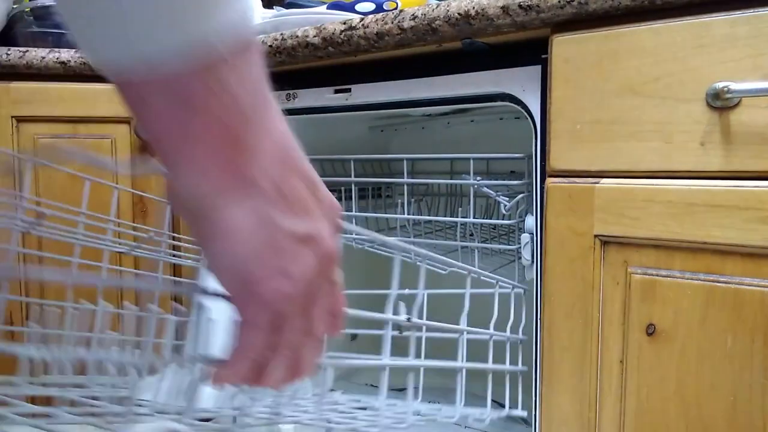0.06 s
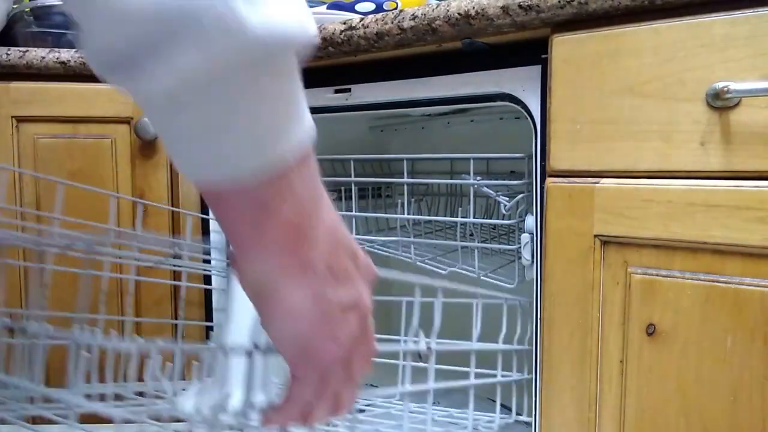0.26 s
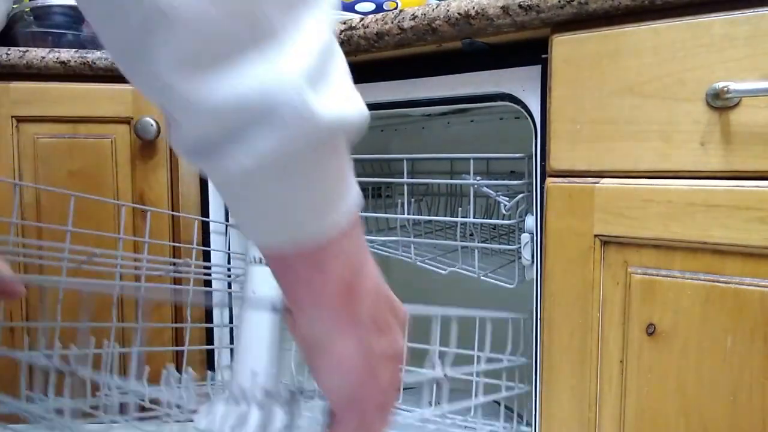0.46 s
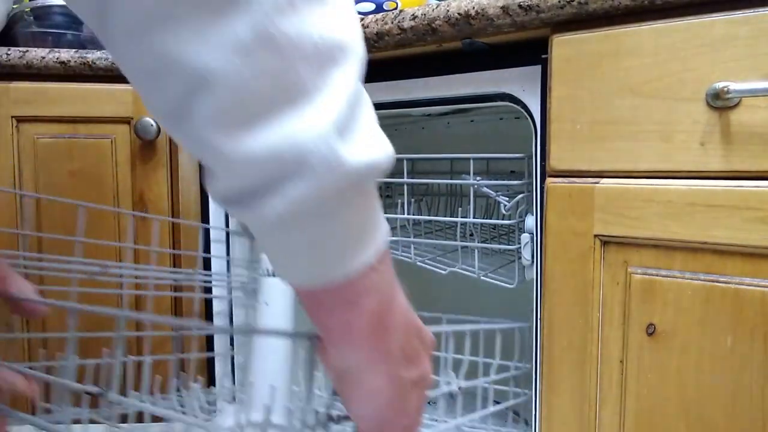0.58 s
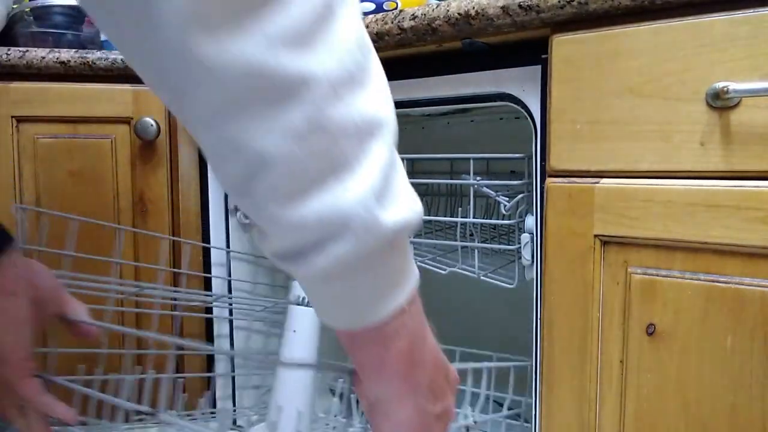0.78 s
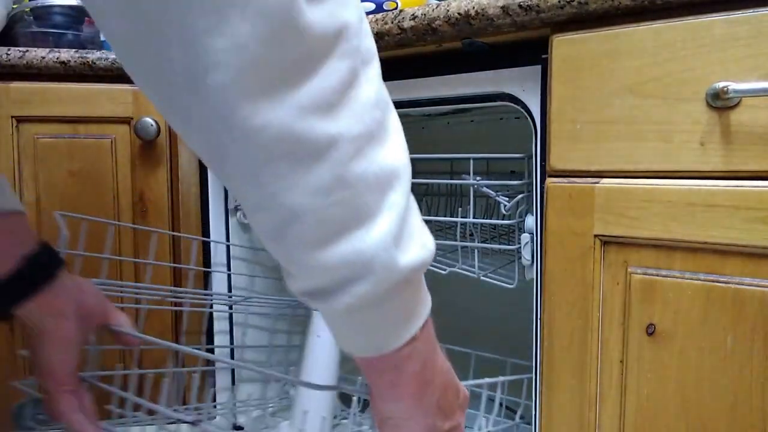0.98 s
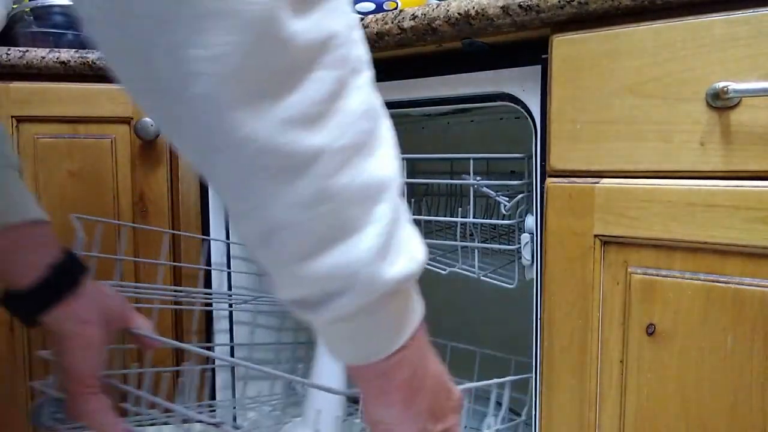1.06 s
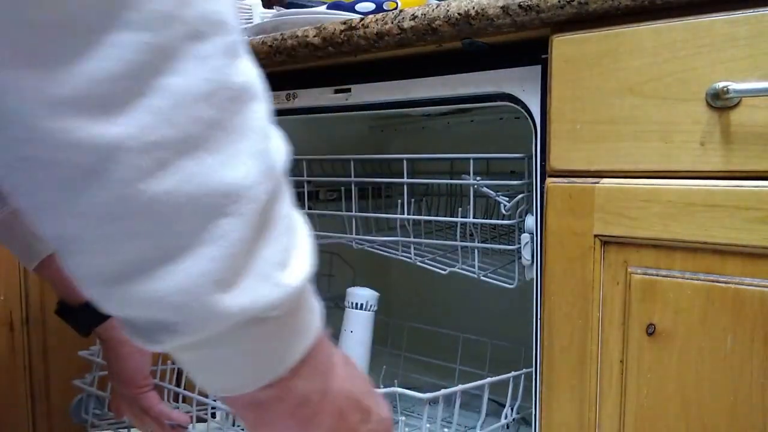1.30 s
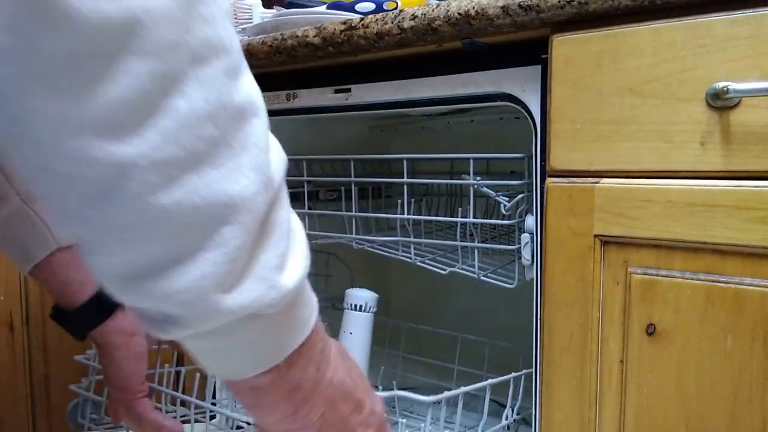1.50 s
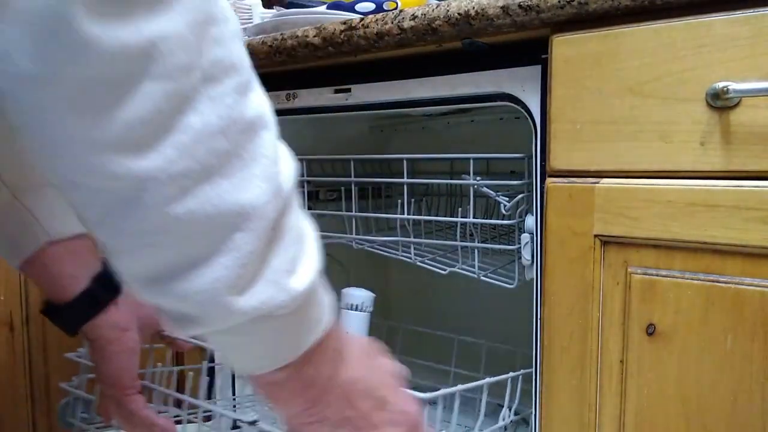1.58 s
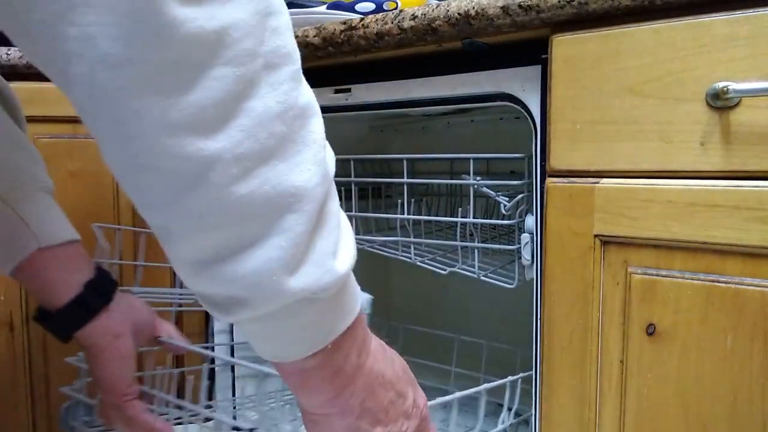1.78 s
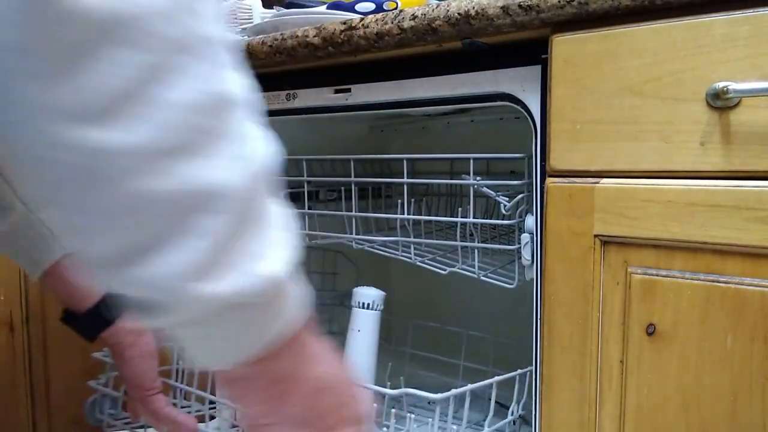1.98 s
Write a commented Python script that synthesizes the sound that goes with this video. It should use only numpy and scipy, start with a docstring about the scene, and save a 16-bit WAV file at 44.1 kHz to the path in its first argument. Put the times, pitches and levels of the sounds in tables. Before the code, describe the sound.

A wire dishwasher rack knocks and rattles against the hollow open door from about 0.2 seconds, with short scrapes between the knocks. It lands with one loud, briefly ringing clank at 0.8 seconds, then chatters and scrapes along the door, fading by 1.3 seconds. A lighter knock comes at 1.7 seconds and faint scraping follows near 2 seconds, over the low hush of a small kitchen.

```python
"""A faint scrape and a few light knocks sound over the hush of a small kitchen: a coated wire dishwasher
rack is lowered onto the open door and shoved along it. Its wires and wheels knock on the hollow door,
with one loud clank as it lands; between knocks it scrapes and chatters. Every contact rings the same
wires and door panel, and the room answers briefly."""
import sys
import numpy as np
from scipy import signal
from scipy.fft import rfft, irfft
from scipy.io import wavfile

SR = 44100
rng = np.random.default_rng(int(sys.argv[2]) if len(sys.argv) > 2 else 0)


def transcribe(u):
    """Save the signal u as a 16-bit wav file named by the first command-line argument.

    u: samples, shape (n,) or (channels, n), limited to [-1, 1]; the rate is SR.
    q: integer samples, one column per channel.
    """
    v = np.clip(np.atleast_2d(u).T, -1, 1)
    q = np.round(v * 32767).astype(np.int16)
    wavfile.write(sys.argv[1], SR, q)


N = 90404
SIZE = 32768  # samples per event
HZ, T = np.fft.rfftfreq(SIZE, 1 / SR), np.arange(SIZE) / SR


def amp(db):
    """Decibels to gain."""
    return 10 ** (np.asarray(db) / 20)


def curve(points, hz):
    """Interpolates (frequency, value) points on a log-frequency axis."""
    points_hz, values = np.transpose(points)
    return np.interp(np.log(hz + 1), np.log(points_hz + 1), values)


def add(mix, time_s, sound):
    """Mixes a stereo sound in at time_s."""
    part = mix[:, max(round(time_s * SR), 0):][:, :sound.shape[1]]
    part += sound[:, :part.shape[1]]


def ripple(width_hz):
    """Random spectral peaks and dips, growing in above the door's range."""
    knots = rng.standard_normal(len(HZ))
    return np.interp(HZ / width_hz, np.arange(len(HZ)), knots) * np.minimum(HZ / 1500, 1)


# stereo balance (frequency [Hz], left minus right [dB])
BALANCE = [(300, -.5), (700, -0.4), (2800, 1), (5500, 2.5), (10000, 0.5), (14000, 14)]
def balance_db(hz):
    """Left and right level offsets."""
    return np.outer([0.5, -0.5], curve(BALANCE, hz))


# likeness of the two channels (frequency [Hz], correlation [ratio])
CORRELATION = [(100, 0.98), (350, 0.91), (700, 0.66), (1400, 0.12), (6000, 0.033)]
def noise_spectra(size):
    """White noise at two microphones, alike in the bass."""
    a, b = rfft(rng.standard_normal((2, size)))
    correlation = curve(CORRELATION, np.fft.rfftfreq(size, 1 / SR))
    mid = a * np.sqrt((1 + correlation) / 2)
    side = b * np.sqrt((1 - correlation) / 2)
    return np.array([mid + side, mid - side])


def mode(hz, db, t60_s, rise_cycles=0.6, mic_spread_s=0.00018):
    """One decaying sine, reaching each microphone at a slightly different time."""
    phase = 2 * np.pi * (rng.random() + hz * mic_spread_s * rng.uniform(-0.44, 1, (2, 1)))
    attack = 1 - np.exp(-T * hz / rise_cycles)
    return amp(db - 60 * T / t60_s) * attack * np.sin(2 * np.pi * hz * T + phase)


def cluster(hz, width_ratio):
    """Crowded modes around one pitch: narrowband noise, unit RMS."""
    band = irfft(noise_spectra(SIZE) / (1 + ((HZ / hz - 1) / width_ratio) ** 2) ** 2)
    return band / band.std()


def ring_envelope(rise_s, ring_t60_s, tail_db, tail_t60_s):
    """Attack, fast first decay, weaker and slower tail."""
    attack = 1 - np.exp(-T / rise_s)
    return attack * np.hypot(amp(-60 * T / ring_t60_s), amp(tail_db - 60 * T / tail_t60_s))


# kitchen hush spectrum (frequency [Hz], relative density [dB])
HUSH = [(15, -52), (25, -42), (117, -5.5), (249, -1.5), (270, -12.5), (344, -6), (384, -9.5), (1300, -22.5),
        (16000, -35)]
def room_tone(rms_db=-66):
    """Low, steady hush of the kitchen."""
    hush = irfft(noise_spectra(N) * amp(curve(HUSH, np.fft.rfftfreq(N, 1 / SR))), N)
    return amp(rms_db) * hush / hush.std()


# flicked wires, and the ring of the rack's frame in the loud clank (time [s], pitch [Hz], level [dB])
PINGS = [(0.209, 2220, -42.5), (0.21, 3920, -42), (0.214, 7080, -42.5), (0.453, 8500, -41.5),
         (0.741, 14600, -50), (0.790, 14400, -37), (0.7905, 2165, -31.5), (0.800, 2150, -36.5),
         (1.0657, 3380, -51.5), (1.1196, 2580, -48.5), (1.168, 4900, -58), (1.1995, 3460, -55.5),
         (1.727, 2100, -50), (1.907, 4220, -59)]
def pings(note_db=-7.5, tail_db=-3.5, rise_s=0.00027, ring_t60_4khz_s=0.032, tail_t60_4khz_s=0.17):
    """Each ping rings one clear note in a tight cluster of modes; higher ones die sooner."""
    out = np.zeros((2, N))
    for time_s, hz, db in PINGS:
        decay_scale = (4000 / hz) ** 0.25
        t60_s = ring_t60_4khz_s * decay_scale
        envelope = ring_envelope(rise_s, t60_s, tail_db, tail_t60_4khz_s * decay_scale)
        ring = envelope * cluster(hz, width_ratio=0.12) + mode(hz, note_db, t60_s)
        add(out, time_s, amp(db + balance_db(hz)) * ring)
    return out


# joint response of door and rack (frequency [Hz], gain [dB])
RESPONSE = [(25, -31), (45, -28), (72, 6.5), (170, -2), (225, 1.5), (275, -5), (345, 2.5), (470, -6.5),
            (720, 2), (880, -0.5), (1100, 4.5), (1400, -2), (2200, -1.5), (4200, 1.5), (8500, 1),
            (11500, -6.5), (15500, -11)]
# contact bands: door thud, door body, clack, wire, tick, fizz
# (centre [Hz], rise [s], ring t60 [s], tail level [dB], tail t60 [s])
BANDS = [(101, 0.04, 0.26, -19.5, 0.425), (298, 0.0012, 0.06, -4, 0.4), (900, 0.00027, 0.0088, -4.5, 0.27),
         (2610, 0.00013, 0.013, -3.5, 0.24), (6900, 0.0012, 0.012, -2, 0.24),
         (15200, 0.00045, 0.039, -1, 0.28)]
def contact(levels_db, wire_ripple_db, fizz_re_tick_db=-4):
    """One contact: crowded door and wire modes die quickly and leave a tail in the room."""
    centres_hz = [band[0] for band in BANDS]
    bands_db = [*levels_db, levels_db[-1] + fizz_re_tick_db]
    excitation_db = curve(list(zip(centres_hz, bands_db)), HZ)
    spot_ripple_db = 3 * ripple(width_hz=415)  # each spot favours its own range of wire modes
    colour_db = excitation_db + curve(RESPONSE, HZ) + wire_ripple_db + spot_ripple_db
    pink_slope = np.sqrt(SR / 2 / (HZ + 1))
    spectra = noise_spectra(SIZE) * amp(colour_db + balance_db(HZ)) * pink_slope
    out = np.zeros((2, SIZE))
    for selector, (_, *envelope) in zip(np.eye(len(BANDS)), BANDS):
        band_gain = curve(list(zip(centres_hz, selector)), HZ)
        out += ring_envelope(*envelope) * irfft(spectra * band_gain)
    return out


# shoves along the door
# (start [s], length [s], door thud [dB], door body [dB], clack [dB], wire [dB], tick [dB])
SHOVES = [(0.0, 0.092, -64.5, -86, -81, -74.5, -71.5), (0.448, 0.066, -47, -48, -45, -46.5, -46.5),
          (0.506, 0.055, -60, -75, -41.5, -42, -54.5), (0.553, 0.038, -52, -51.5, -53, -51, -61),
          (0.644, 0.083, -62, -57, -47.5, -49, -59.5), (0.696, 0.084, -66, -45, -47, -47.5, -52.5),
          (0.831, 0.1, -55, -46, -41.5, -40.5, -47), (0.936, .07, -52, -50.5, -52, -57, -68),
          (1.043, 0.085, -51, -43.5, -49.5, -58, -64), (1.117, 0.082, -65, -53, -50.5, -62, -58.5),
          (1.221, 0.036, -62, -73, -57, -56.5, -68), (1.299, 0.047, -67.5, -53.5, -58.5, -61.5, -72.5),
          (1.822, 0.026, -68, -67, -58.5, -73.5, -78), (1.921, 0.092, -102, -68, -83, -69, -73),
          (2.024, 0.025, -88, -58.5, -72, -72, -67)]
def scrapes(wire_ripple_db, contacts_per_s=420, spots=3, spread_db=3.5, fade_s=0.0053):
    """The sliding rack chatters: small contacts at random moments on a few spots."""
    out = np.zeros((2, N))
    for start_s, length_s, *levels_db in SHOVES:
        stroke = np.clip(np.minimum(T, length_s - T) / fade_s, 0, 1)
        for _ in range(spots):
            strength = amp(spread_db * np.minimum(rng.exponential(1, SIZE), 3))
            polarity = rng.choice([-1, 1], SIZE)
            touching = rng.random(SIZE) < contacts_per_s / spots / SR
            clicks = strength * polarity * touching * stroke
            clicks *= np.sqrt(length_s / 0.035) / (np.linalg.norm(clicks) + 1e-6)  # unit energy per 35 ms
            chatter = signal.fftconvolve(contact(levels_db, wire_ripple_db), clicks[None], axes=1)
            add(out, start_s, chatter)
    return out


# onsets of hard blows (time [s], level [dB])
BLOW_CRACKS = [(0.2101, -43), (0.656, -50), (0.732, -54), (0.7894, -28), (0.7944, -24), (1.023, -49),
               (1.727, -41)]
def cracks(decay_s=0.0011, lowpass_hz=1700):
    """A hard blow starts with a dry crack: a millisecond or two of dulled noise."""
    out = np.zeros((2, N))
    for time_s, db in BLOW_CRACKS:
        burst = irfft(noise_spectra(SIZE) * amp(balance_db(HZ)) / np.hypot(1, HZ / lowpass_hz))
        add(out, time_s, amp(db) * np.exp(-T / decay_s) * burst / burst.std())
    return out


# modes of the rack's frame (frequency [Hz], relative level [dB], t60 [s])
FRAME_MODES = [(343.4, -14.5, 0.13), (690, -20, 0.155), (1024, -6, 0.3), (1142, -32.5, 0.51),
               (2210, -16, 0.072)]
# wheels and wires striking the door (time [s], door thud [dB], door body [dB], clack [dB], wire [dB],
# tick [dB], note pitch [Hz], note level [dB])
BLOWS = [(0.212, -57.5, -35.5, -50.5, -38, -43, 380, -45.5), (0.254, -47, -42, -49, -43, -47.5, 335, -41.5),
         (0.2828, -52, -73, -40, -36.5, -42, 75, -41.5), (0.310, -74, -48, -56, -49, -78, 948, -38),
         (0.4138, -49, -48, -40, -62, -58.5, 643, -36), (0.424, -83, -34.5, -42.5, -43.5, -49.5, 79, -29.5),
         (0.439, -40.5, -43, -44.5, -45, -48, 315, -46), (0.523, -74, -42, -61, -57, -44, 1016, -46),
         (0.654, -42, -44.5, -46.5, -55, -65, 152, -35.5), (0.682, -61, -63, -60, -55, -71, 113.8, -31),
         (0.732, -42, -38.5, -37, -43, -65, 647, -30), (0.7427, -41.5, -32, -85, -79, -48.5, 241, -48),
         (0.7903, -33, -40, -28.5, -36, -31, 709, -21), (0.7965, -46, -28, -48, -37, -42.5, 765, -18.5),
         (0.8031, -69, -23.5, -52, -32, -61, 739, -22.5), (0.817, -38, -51, -44, -35.5, -52, 329, -25),
         (0.845, -66, -42.5, -29, -39, -51, 593, -26), (0.911, -47, -51, -34, -43.5, -54, 1093, -34),
         (0.955, -75, -48, -73, -42, -59, 260, -40), (1.0237, -67, -52, -37, -53, -62.5, 794, -33),
         (1.041, -54, -40.5, -44, -68, -61, 693, -32.5), (1.054, -59, -51, -51, -49.5, -55.5, 145, -36.5),
         (1.1221, -50, -65, -39, -56, -59, 1093, -37), (1.131, -54, -42.5, -37, -53, -58, 133, -37),
         (1.15, -62, -54.5, -40.5, -69, -69, 357, -33), (1.166, -44, -38, -51.5, -48.5, -55.5, 1540, -44),
         (1.201, -54, -72.5, -46, -44, -53.5, 213, -37), (1.6606, -60, -56, -54, -61, -79.5, 796, -48),
         (1.7271, -51.5, -46.5, -44, -45, -58, 816, -36.5),
         (1.909, -76, -55.5, -62.5, -62, -69.5, 340, -75)]
def knocks(wire_ripple_db, note_t60_1khz_s=0.051, panel_t60_s=0.13,
           panel_re_note_db=-15, frame_re_clack_db=-6):
    """The rack strikes the door: clatter, hollow note of the struck spot, ring of the frame."""
    out = np.zeros((2, N))
    for time_s, thud_db, body_db, clack_db, wire_db, tick_db, note_hz, note_db in BLOWS:
        note = mode(note_hz, note_db, note_t60_1khz_s * (1000 / note_hz) ** 0.43)
        # neighbouring panel modes roughen the note
        panel = cluster(note_hz, width_ratio=0.2) * (1 - np.exp(-T * note_hz))
        panel *= amp(note_db + panel_re_note_db - 60 * T / panel_t60_s)
        frame = sum(mode(hz, clack_db + frame_re_clack_db + db, t60_s) for hz, db, t60_s in FRAME_MODES)
        clatter = contact([thud_db, body_db, clack_db, wire_db, tick_db], wire_ripple_db)
        add(out, time_s, clatter + note + panel + frame)
    return out


def scene():
    """One rack cracking, knocking, scraping and pinging over the room tone."""
    wire_ripple_db = 2 * ripple(width_hz=32)  # narrow wire modes, shared by all contacts
    return room_tone() + cracks() + knocks(wire_ripple_db) + scrapes(wire_ripple_db) + pings()


def record(dry):
    """Bass roll-off and band limit."""
    low_cut_hz, high_cut_hz = 40, 16250
    highpass = signal.butter(3, low_cut_hz, "highpass", fs=SR, output="sos")
    lowpass = signal.firwin(401, high_cut_hz, window=("kaiser", 8), fs=SR)
    return signal.oaconvolve(signal.sosfilt(highpass, dry), lowpass[None], "same")


dry = scene()
out = record(dry)
transcribe(out)
```